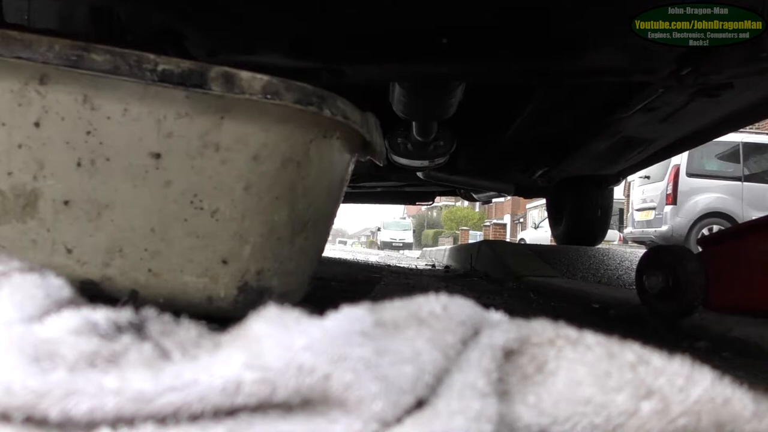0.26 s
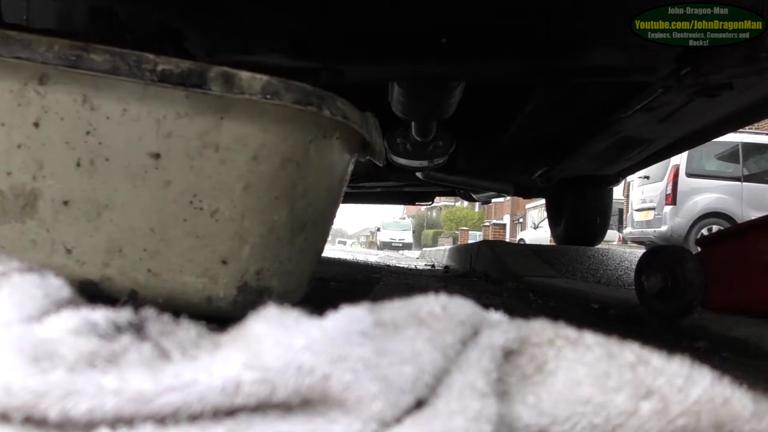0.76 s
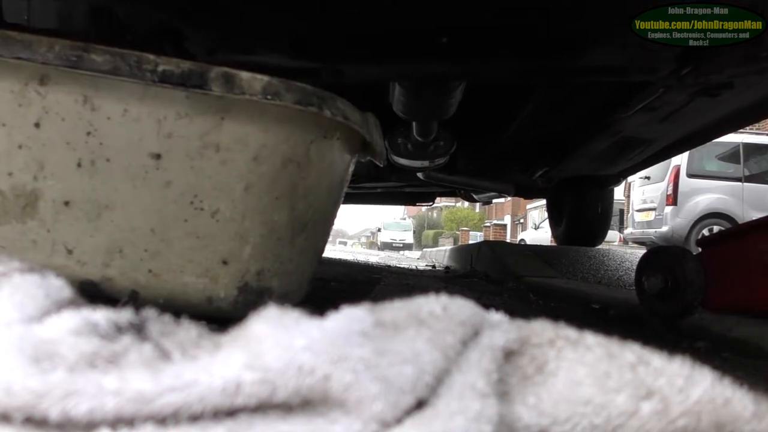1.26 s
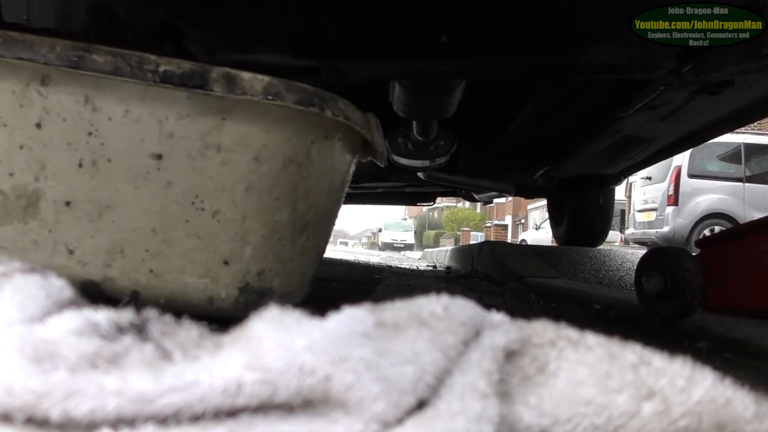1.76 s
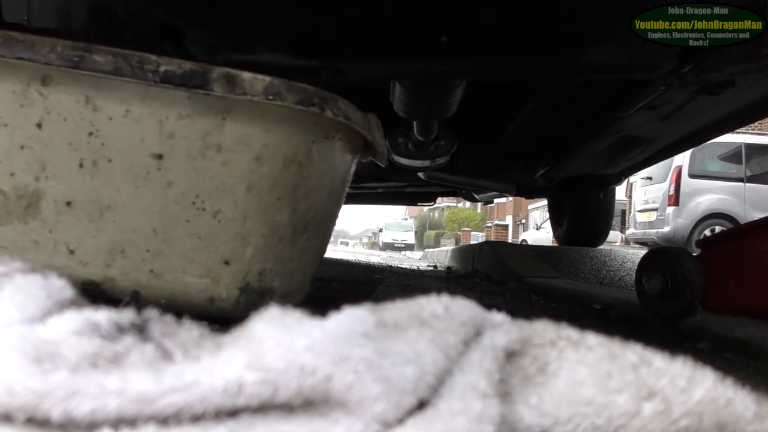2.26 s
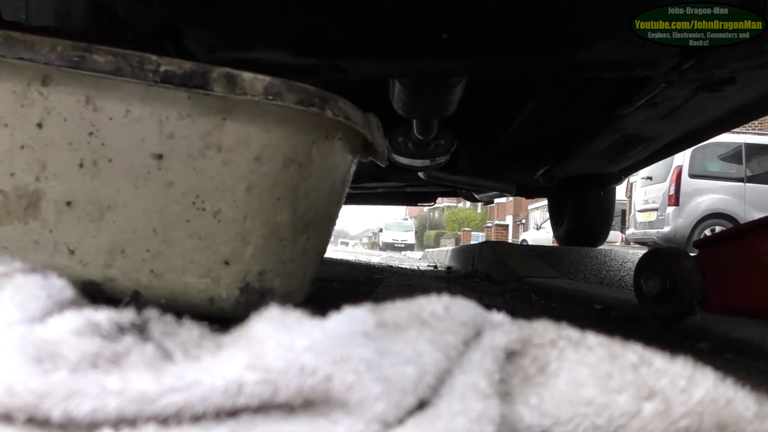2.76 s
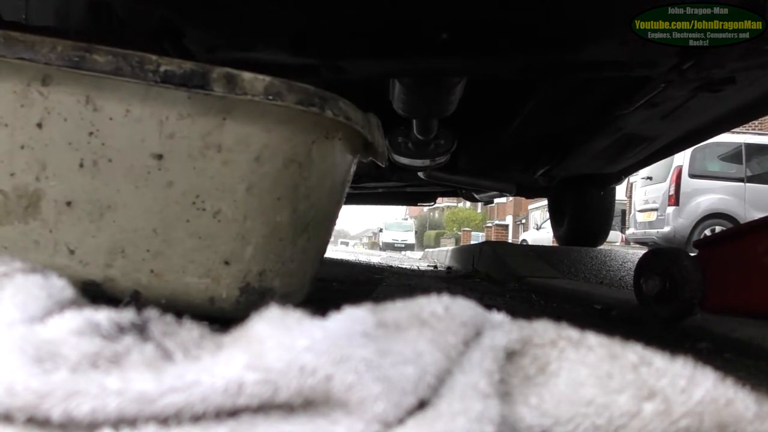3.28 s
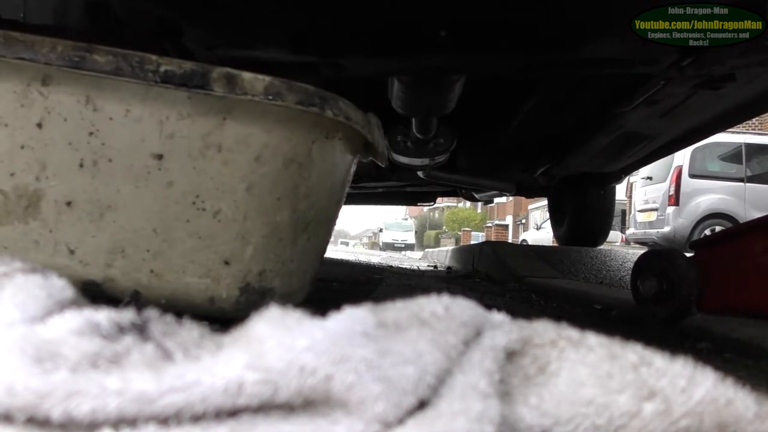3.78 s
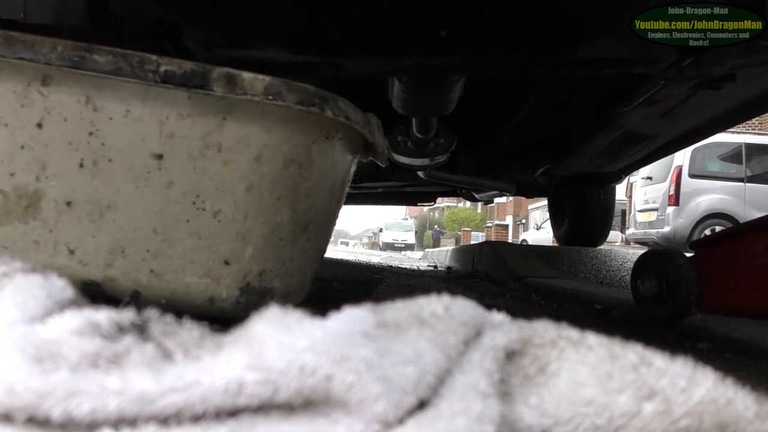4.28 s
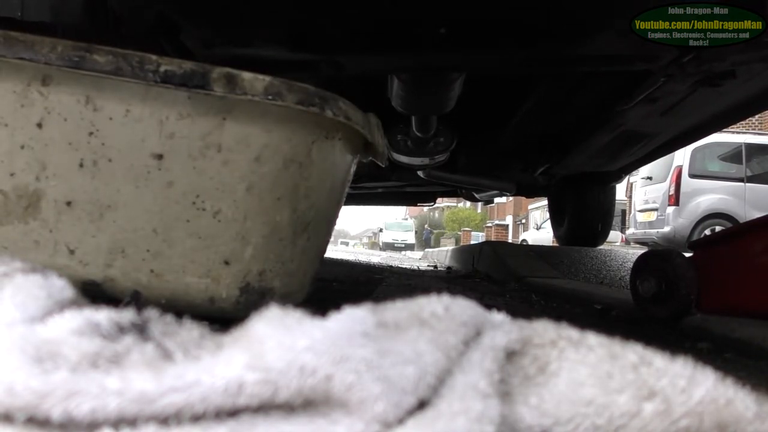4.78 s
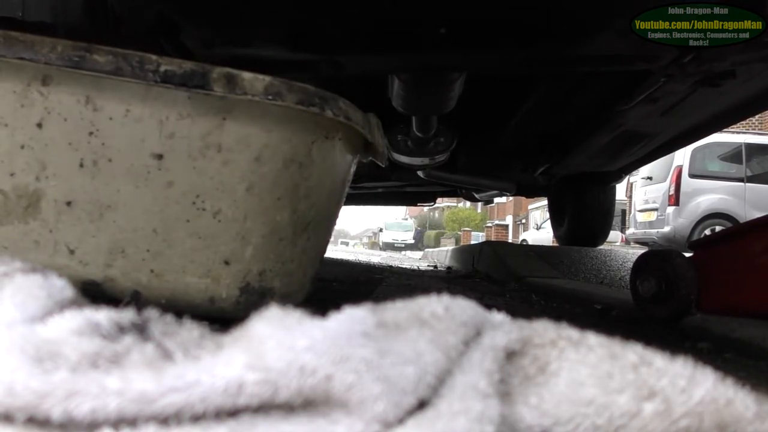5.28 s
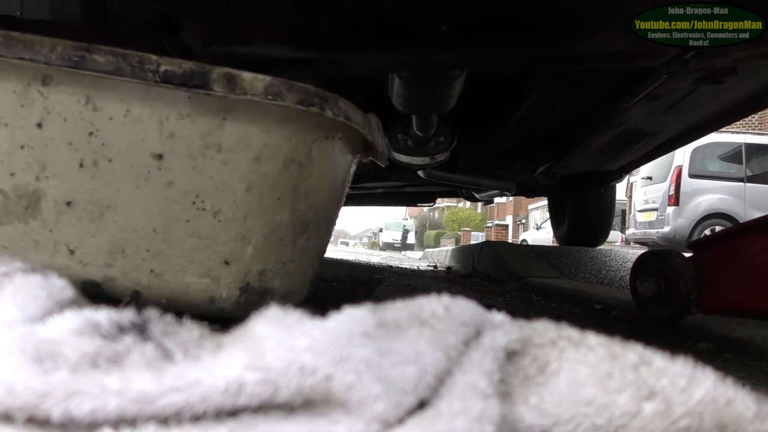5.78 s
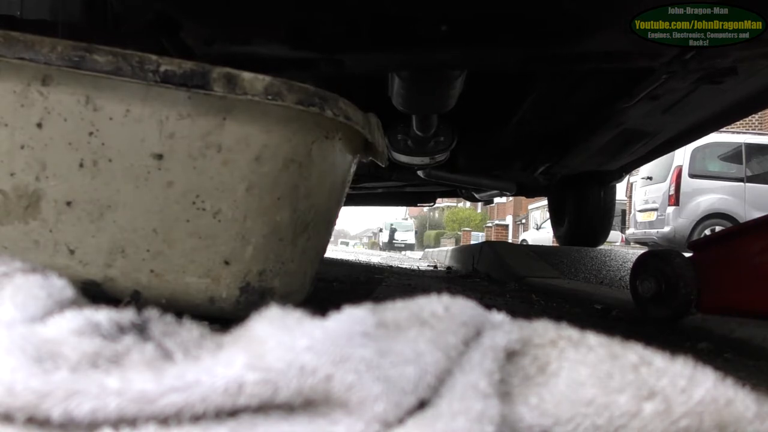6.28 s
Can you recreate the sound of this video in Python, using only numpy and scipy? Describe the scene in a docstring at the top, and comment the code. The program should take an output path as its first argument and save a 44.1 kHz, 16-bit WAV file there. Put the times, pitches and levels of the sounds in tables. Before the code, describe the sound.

Irregular knocks of metal on metal, slightly to the right, come in six clusters. Dull body-panel thumps and gritty, quiet sliding lead into sharp bright clanks and chatter as the handle reaches bottom and swings loose. Everything is dry and near, with a tight echo from the car's underside, slight level ducking after loud hits and faint traffic hum behind.

```python
"""A trolley jack is pumped under a car on a driveway, heard from the ground close by, over a faint street hum.
In each of six strokes filtered noise makes two slides scrape, one as the handle starts down, one before bottom.
All along, bursts of noise ring steel modes as knocks and rattles, and low panels as thuds; a few deep jolts swing.
Around and after bottom the unloaded handle sings as a fading sine; a thin part sings after some thuds.
Short echoes under the car join in, and the microphone's gain control ducks a little after loud knocks."""
import sys
import numpy as np
from scipy import signal
from scipy.fft import rfft, irfft, next_fast_len
from scipy.io import wavfile
from scipy.ndimage import uniform_filter1d, map_coordinates

SR = 44100
rng = np.random.default_rng(int(sys.argv[2]) if len(sys.argv) > 2 else 0)


def persist_wave(psi):
    """Save psi, clipped to +-1, as 16-bit WAV."""
    counts = np.round(np.clip(psi, -1, 1) * 32767).astype(np.int16)
    wavfile.write(sys.argv[1], SR, np.atleast_2d(counts).T)


N = 288224

# All levels in dB are relative; t60 is the time a sound takes to fade by 60 dB.
# tone colour of the street: pitch_hz, level_db
STREET_COLOUR = [(15, -55), (25, -25), (108, -2), (180, -6), (363, -9.5), (695, -21), (2110, -19),
                 (3430, -27), (6000, -36), (16000, -39.5)]
# how alike left and right are in the noise: pitch_hz, likeness (0 to 1)
LEFT_RIGHT_LIKENESS = [(60, 0.99), (12000, 0.69)]
STREET_PATCHY_DB = 1.2
# how long echoes last under the car: pitch_hz, t60_s
UNDERCAR_ECHO = [(200, 0.19), (10000, 0.039)]

# deep jolts that reach the microphone through the ground: start_s, level_db
JOLTS = [(1.33, -31), (4.5, -26), (5.53, -34), (6.16, -44)]
JOLT_HZ, JOLT_T60_S = 38, .15
# the load settling on the ram: start_s, floor_pan_level_db, frame_level_db
THUDS = [(0.258, -20, -25.5), (0.341, -24, -28.5), (0.462, -40, -22), (0.613, -30, -17), (1.311, -22, -36),
         (1.392, -23.5, -21), (1.497, -21, -26), (1.716, -50, -20.5), (2.385, -14, -27),
         (2.47, -23.5, -22.5), (2.819, -20, -11), (3.097, -39, -22.5), (3.46, -13, -22.5),
         (3.529, -16.5, -23), (3.676, -32.5, -21.5), (3.879, -18.5, -16.5), (4.101, -32, -28),
         (4.508, -20.5, -24), (4.572, -20.5, -20), (4.927, -17, -21), (5.521, -16, -17), (5.586, -18, -20),
         (5.951, -18.5, -20)]
# panels of car floor and jack frame: pitch_hz, level_db, t60_s
PANELS = [(105, -6, .22), (125, 0, .3), (145, -6, .18), (200, -2, .12), (235, 0, .16), (280, -1, .11),
          (370, -3, .14), (410, -2, .18)]

# pump strokes: handle_down_start_s, handle_bottom_s, first_slide_level_db, second_slide_level_db
STROKES = [(0.026, 0.615, -48, -38.5), (1.096, 1.646, -45, -40.5), (2.254, 2.758, -43.5, -44),
           (3.325, 3.866, -45, -36.5), (4.36, 4.97, -41, -44.5), (5.432, 5.98, -43, -48.5)]
SLIDE_S, SECOND_ENDS_S = 0.29, 0.012  # length of a slide; the second ends this long before bottom
FREE_S, EASES_S = .32, .04  # the handle swings unloaded this long after bottom, and from this long before
HANDLE_HZ, HANDLE_T60_S = 2035, 0.47
# ring of the handle compared with the blow, one entry per stroke: level_db
HANDLE_RING_DB = [-27, -27, -22, -30, -33, -24]
THIN_HZ, THIN_T60_S = 14050, .2
# blows that set the thin part singing: start_s, level_db
THIN_BLOWS = [(2.385, -52), (3.46, -54), (4.51, -51), (4.582, -42), (5.52, -40)]

# metal knocking on metal: start_s, frame_level_db, link_level_db
CONTACTS = [(0.26, -30, -70), (0.327, -24, -32), (0.4314, -21.5, -28.5), (0.4725, -16.5, -27),
            (0.493, -24.5, -11.5), (0.612, -12, -21.5), (0.6356, -19.5, -25), (0.7645, -22, -31.5),
            (0.789, -15.5, -14.5), (0.821, -20, -14.5), (1.393, -20.5, -26), (1.492, -22, -58),
            (1.512, -24.5, -17.5), (1.5687, -17.5, -26.5), (1.59, -24, -12), (1.672, -32.5, -38),
            (1.709, -20.5, -34.5), (1.728, -14.5, -15.5), (1.8304, -19, -20), (1.848, -25.5, -12),
            (1.88, -24, -13), (1.8906, -15, -15.5), (2.35, -24, -26.5), (2.377, -19, -23.5),
            (2.472, -17.5, -29.5), (2.602, -30, -25.5), (2.6532, -18, -25), (2.661, -63, -9.5),
            (2.796, -19, -32.5), (2.816, -15, -17), (2.9053, -10.5, -15.5), (2.9653, -16.5, -15.5),
            (3.0958, -21.5, -31), (3.138, -34, -35), (3.388, -20.5, -68), (3.453, -19, -29),
            (3.525, -17, -20.5), (3.555, -23, -42), (3.6548, -18, -21.5), (3.6791, -15, -21.5),
            (3.708, -36, -17), (3.735, -25, -19), (3.8413, -18.5, -34), (3.871, -19, -22),
            (3.9544, -10.5, -13.5), (4.0299, -16, -17), (4.092, -34.5, -47), (4.4954, -16.5, -35),
            (4.5727, -18.5, -24), (4.7277, -28, -26), (4.7623, -19, -24), (4.905, -17, -29.5),
            (4.929, -15, -30.5), (5.0174, -9, -16), (5.072, -16.5, -18), (5.5135, -16, -30),
            (5.645, -38, -58), (5.78, -19, -20.5), (5.934, -25, -40), (5.9474, -14, -22.5),
            (5.9603, -13.5, -14.5), (6.08, -9.5, -19.5), (6.1166, -32, -19.5), (6.151, -27, -27),
            (6.164, -15.5, -12)]
# scuffs and rattles that swell in more slowly than most knocks: start_s, frame_level_db, link_level_db
SCUFFS = [(0.392, -31, -63), (0.453, -29, -33), (1.303, -29.5, -31.5), (1.599, -26, -34),
          (2.287, -33, -34.5), (2.536, -24, -38), (2.561, -26, -39), (2.674, -31, -34.5),
          (2.931, -35, -19.5), (3.625, -26.5, -42), (3.758, -29, -41), (3.9919, -28, -20.5),
          (4.769, -27, -9), (5.5494, -29, -30), (5.5834, -17.5, -31.5), (5.75, -31.5, -31),
          (5.798, -20, -10)]
# steel of the jack: pitch_hz, level_db
STEEL = [(1290, 22), (1720, 23), (1900, 10.5), (2540, 6), (3500, 11), (4800, -3), (6170, -3.5), (6640, -6),
         (7540, -3.5), (9080, -6.5), (10310, 0), (10850, -1), (11950, -12), (12850, -7.5)]
STEEL_T60_S = .04
PIN_HZ, LINK_HZ, BODY_HZ = 4500, 8300, 1900  # band edges, and where the frame's dense modes crowd
# time scale of a touch: a loaded knock with its frame at -17.5 dB, an unloaded knock, a scuff
LOADED_TOUCH_S, FREE_TOUCH_S, SCUFF_TOUCH_S = 0.0023, .0011, 0.0056
LONGER = 1  # a stronger loaded knock presses longer: dB of time per dB of strength
CHATTER, CHATTER_S = 0.13, 0.015  # rebounds of loose parts: size and fading time
# knocks in which one low mode of the frame stands out: start_s, pitch_hz, level_db
KNOCKS = [(1.494, 1295, -19.5), (1.57, 1755, -30), (1.837, 1730, -23.5), (2.379, 1020, -20),
          (3.456, 1023, -18), (3.682, 1080, -19), (3.954, 1253, -20), (4.931, 2150, -11.5),
          (5.601, 2220, -18), (6.08, 1290, -18.5)]
KNOCK_RISE_S, KNOCK_T60_S = 0.002, 0.023
TOP_HZ = 15750  # upper band limit of the microphone signal


def amp(db):
    """Turns decibels into a plain factor."""
    return 10 ** (np.asarray(db) / 20)


def unit(x):
    """Scales a signal to an rms of 1."""
    return x / np.sqrt(np.mean(x ** 2) + 1e-20)


def along(points, hz):
    """Reads a curve of (Hz, value) points on a log pitch axis."""
    f, v = np.transpose(points)
    return np.interp(np.log(hz + 1), np.log(f + 1), v)


def filtered(x, response):
    """Multiplies the spectrum of x by a response that depends on frequency."""
    m = next_fast_len(x.shape[-1] + 4096)
    return irfft(rfft(x, m) * response(np.fft.rfftfreq(m, 1 / SR)), m)[..., :x.shape[-1]]


def ringing(modes, t):
    """Makes one decaying sine per row of (Hz, dB, t60 s)."""
    hz, db, t60 = np.transpose(modes)[:, :, None]
    return amp(db - 60 * t / np.abs(t60)) * np.sin(2 * np.pi * hz * t)


def add(track, s, sound):
    """Mixes a sound into a track at a time in seconds."""
    track[round(s * SR):][:len(sound)] += sound


def rush(spectrum, patchy_db):
    """Stereo noise of rms 1, coloured, with patches of random gain in time and pitch."""
    z = signal.stft(rng.standard_normal((2, N + 512)), nperseg=512)[2]
    field = uniform_filter1d(rng.standard_normal(z.shape[1:]), size=6, axis=0)
    field = uniform_filter1d(field, size=8, axis=1)
    pair = signal.istft(z * amp(patchy_db * unit(field)), nperseg=512)[1][:, :N]

    def colour(hz):
        # the angle shares the noise between middle and sides, which sets the likeness
        angle = np.arccos(np.clip(along(LEFT_RIGHT_LIKENESS, hz), -1, 1)) / 2
        return amp(along(spectrum, hz)) * [np.cos(angle), np.sin(angle)]

    mid, side = filtered(pair, colour)
    return unit(np.array([mid + side, mid - side]))


def street():
    """Far traffic: a faint, slightly patchy hum of noise, a little stronger on the right."""
    return amp(-42.0) * rush(STREET_COLOUR, patchy_db=STREET_PATCHY_DB) * amp([[-.6], [.6]])


def undercar(x):
    """The low space between ground and car answers at once; each frequency dies at its own speed."""
    hz, t, z = signal.stft(rng.standard_normal((2, SR // 4)), SR, nperseg=256)
    fade = amp(-60 * t / np.abs(along(UNDERCAR_ECHO, hz))[:, None])
    tail = signal.istft(z * fade, SR, nperseg=256)[1]
    return signal.fftconvolve(x[None], tail / np.linalg.norm(tail[0]), axes=1)[:, :N]


def jolts():
    """Each deep jolt swings out in a few slow cycles."""
    out, t = np.zeros(N + SR), np.arange(SR // 4) / SR
    for s, db in JOLTS:
        add(out, s, ringing([(JOLT_HZ, db, JOLT_T60_S)], t)[0])
    return out[:N]


def load():
    """A soft, rumbling shove rings the low panels of car and frame, which shift a little under each new load."""
    out, t = np.zeros(N + SR), np.arange(SR // 2) / SR
    panels = np.array(PANELS)
    deep = panels[:, 0] < 160  # these follow the floor pan level, the rest the frame level
    for s, *part_db in THUDS:
        shift = 1 + [.035, 0, 0] * rng.standard_normal((len(panels), 1))  # moves the pitch only
        modes = ringing(panels * shift, t)
        shove = rng.standard_normal(SR // 20) * amp(-60 * t[:SR // 20] / 0.1)
        strength = amp(2.5 * rng.standard_normal(len(modes)))
        for part, db in zip((deep, ~deep), part_db):
            thud = signal.fftconvolve((strength * part) @ modes, shove)
            add(out, s, amp(db) * thud / np.abs(thud).max())
    # panels this small radiate no deep bass
    return filtered(out[:N], lambda hz: 1 / (1 + (88 / (hz + 1)) ** 4))


def scrapes():
    """Rubbing, a dense rattle of tiny contacts, swells and fades over each slide and sets the steel buzzing."""
    t = np.arange(N) / SR
    slide = np.zeros(N)
    for down_s, bottom_s, first_db, second_db in STROKES:
        for s, db in ((down_s, first_db), (bottom_s - SECOND_ENDS_S - SLIDE_S, second_db)):
            slide += amp(db) * np.sin(np.pi * np.clip((t - s) / SLIDE_S, 0, 1))
    bumps = amp(3 * map_coordinates(rng.standard_normal(N // 300 + 4), [np.arange(N) / 300]))
    grains = amp(3 * rng.exponential(size=N // 30 + 1).repeat(30)[:N])  # single grains catch
    colour = [(500, 10), (1500, 24.2), (4000, 21.0), (15000, 10.6)]  # Hz, dB
    rub = bumps * grains * rush(colour, patchy_db=3.5).mean(axis=0)
    steel = ringing([(hz, db, STEEL_T60_S) for hz, db in STEEL], t[:SR // 10]).sum(axis=0)
    buzz = signal.fftconvolve(rub, steel)[:N]
    return slide * unit(unit(rub) + 0.33 * unit(buzz))


def singing(hz, t60, blows, waver):
    """One lightly damped mode that every blow tops up; its level wavers at a random rate after each blow."""
    out, t = np.zeros(N + SR), np.arange(SR // 2) / SR
    for s, db in blows:
        wavering = 1 + waver * np.sin(2 * np.pi * (rng.uniform(4.2, 29.0) * t + rng.random()))
        level = amp(db - 60 * t / t60) * (1 - np.exp(-t / 0.00061)) * wavering
        # counting time from the very start keeps all the rings in step
        add(out, s, level * np.sin(2 * np.pi * hz * (t + round(s * SR) / SR)))
    return out[:N]


def thin_part():
    """A thin part sings on after some thuds as a high fading sine."""
    return singing(THIN_HZ, THIN_T60_S, THIN_BLOWS, waver=0.4)


def free(s):
    """Lists the index of the stroke whose handle swings unloaded at this time, if any."""
    return [k for k, row in enumerate(STROKES) if -EASES_S < s - row[1] < FREE_S]


def handle():
    """Unloaded, the handle sings on after every blow to the frame."""
    blows = [(s, (frame_db + link_db) / 2 + HANDLE_RING_DB[k])
             for s, frame_db, link_db in CONTACTS for k in free(s)]
    return singing(HANDLE_HZ, HANDLE_T60_S, blows, waver=0.35)


def ragged_push(touch, t):
    """A blow is a ragged bunch of tiny impacts: one press and a fading chatter of rebounds."""
    u = t[:SR // 25] / np.clip(touch, 3e-4, .012)
    rebounds = CHATTER * (1 - np.exp(-u)) * np.exp(-t[:len(u)] / CHATTER_S)
    ragged = amp(5 * rng.standard_normal(len(u) // 21).repeat(21))
    return (u ** 2 * np.exp(-u) + rebounds) * rng.standard_normal(len(u)) * ragged


def dense_modes(noise, lo_hz, hi_hz):
    """Modes too crowded to tell apart act as a band of noise, lifted where the frame's modes crowd."""
    def band(hz):
        low_cut = 1 / (1 + (max(lo_hz, 1350) / (hz + 1)) ** 6)
        high_cut = 1 / (1 + (hz / hi_hz) ** 8)
        body = 1 + 1 / (1 + ((hz - BODY_HZ) / 500) ** 2)
        return low_cut * high_cut / (hz + 1) ** 0.5 * body

    return unit(filtered(noise, band))


def contact(track, s, frame_db, link_db, touch, t):
    """One knock or scuff rings frame, pins and links, each steel mode at a new strength."""
    hz = np.array(STEEL)[:, 0]
    link_over_frame_db = link_db - frame_db
    pin_db = (frame_db + link_db) / 2 - 3.0  # the pins sit between frame and links
    # the stronger the link beside the frame, the clearer pins and links ring
    link_clear_db = np.clip(link_over_frame_db, -12, 6) + 9
    push = ragged_push(touch, t)
    strength = amp(4.5 * rng.standard_normal(len(hz)))
    # the weaker the link beside the frame, the stronger the low modes
    low_tilt = (np.clip(link_over_frame_db, -28, 6) + 13.0) * np.log2(np.minimum(hz, 2200) / 2200)
    strength = strength * amp(8.0 * low_tilt)
    shift = 1 + .012 * rng.standard_normal(len(hz))  # play in the joints detunes the parts a little
    modes = ringing([(f * k, db, STEEL_T60_S) for (f, db), k in zip(STEEL, shift)], t)
    # frame, pins, links: band edges Hz, t60 s of the dense modes, level dB, clear ring dB
    parts = [(950, PIN_HZ, .05, frame_db, 4),
             (PIN_HZ, LINK_HZ, .04, pin_db, link_clear_db),
             (LINK_HZ, 15200, .045, link_db, link_clear_db)]
    for lo_hz, hi_hz, t60, db, clear_db in parts:
        clear = (strength * (hz >= lo_hz) * (hz < hi_hz)) @ modes
        blur = dense_modes(rng.standard_normal(len(t)), lo_hz, hi_hz)
        blur_fade = amp(-60 * t / t60) + 3.95 * amp(-60 * t / 0.0041)  # a ring and a short clack
        ring = amp(clear_db) * clear / np.abs(clear).max() + blur * blur_fade
        sound = signal.fftconvolve(ring, push)
        add(track, s, amp(db + 4.0) * sound / np.abs(sound).max())


def jack():
    """Knocks and scuffs ring the steel parts; in some knocks one low frame mode stands out."""
    out, t = np.zeros(N + SR), np.arange(SR // 9) / SR
    for s, frame_db, link_db in CONTACTS:
        loaded_touch = LOADED_TOUCH_S * amp(LONGER * (frame_db + 17.5))
        contact(out, s, frame_db, link_db, FREE_TOUCH_S if free(s) else loaded_touch, t)
    for s, frame_db, link_db in SCUFFS:
        contact(out, s, frame_db, link_db, SCUFF_TOUCH_S, t)
    for s, knock_hz, db in KNOCKS:
        rise = (1 - np.exp(-t / KNOCK_RISE_S)) ** 2
        knock = rise * ringing([(knock_hz, 0, KNOCK_T60_S)], t)[0]
        add(out, s, amp(db) * knock / np.abs(knock).max())
    return out[:N]


def scene():
    """Sets every direct source a little to the right and adds the echoes under the car."""
    metal = jack() + scrapes() + handle() + thin_part()
    low = load()
    direct = metal * amp([[-2.4], [2.4]]) + low * amp([[-.7], [.7]])
    echoes = amp(-6.5) * undercar(metal + amp(-4.5) * low)
    return direct + echoes + street() + jolts() * amp([[-3], [3]])


def record(dry):
    """Gain control follows the smoothed loudness and recovers gradually; a steep filter cuts the top."""
    keep = np.exp(-1 / (.07 * SR))  # smoothing over 0.07 s
    power = signal.lfilter([1 - keep], [1, -keep], np.mean(dry ** 2, axis=0))
    gain = (1 + power / amp(-26) ** 2) ** -.2
    return np.clip(filtered(dry * gain, lambda hz: 1 / (1 + (hz / TOP_HZ) ** 120)), -1, 1)


dry = scene()
out = record(dry)
persist_wave(out)
```